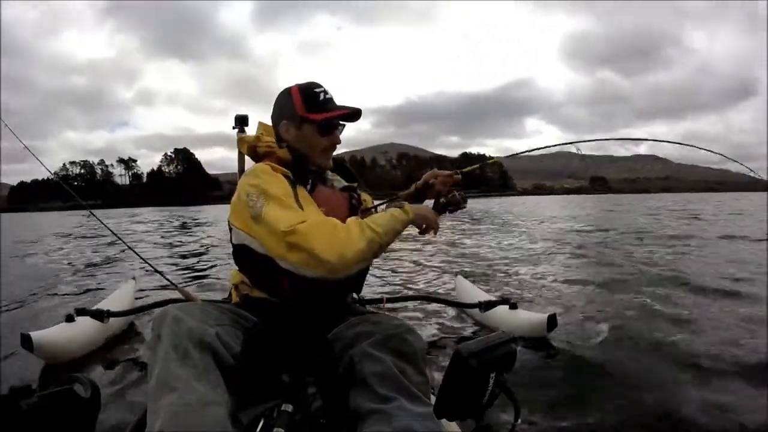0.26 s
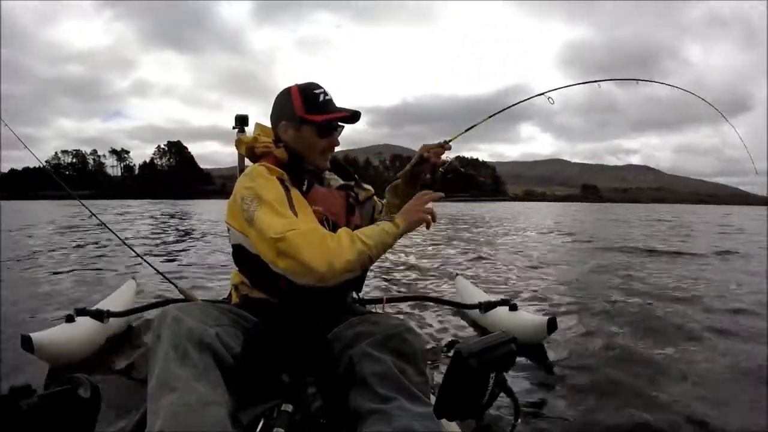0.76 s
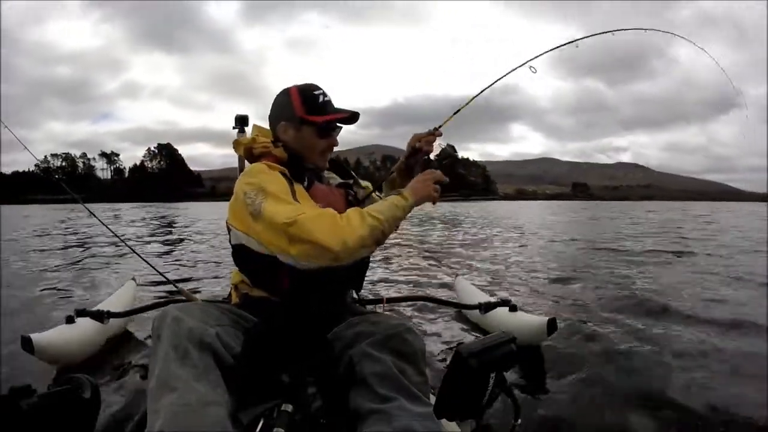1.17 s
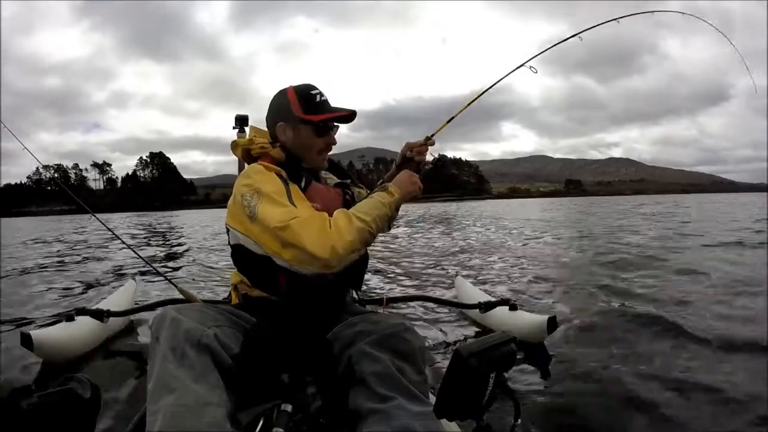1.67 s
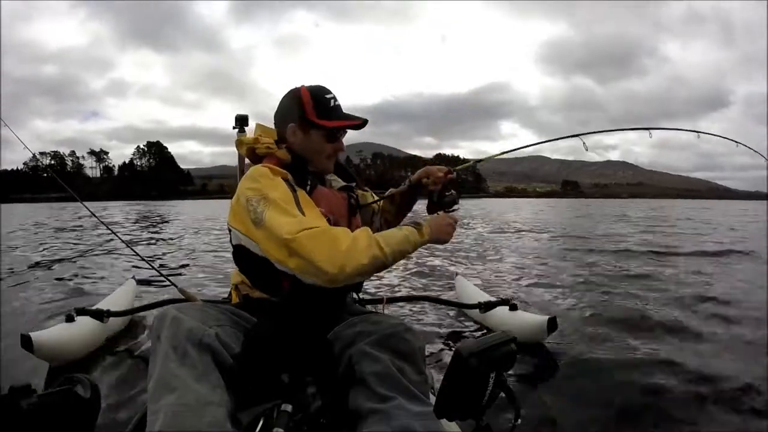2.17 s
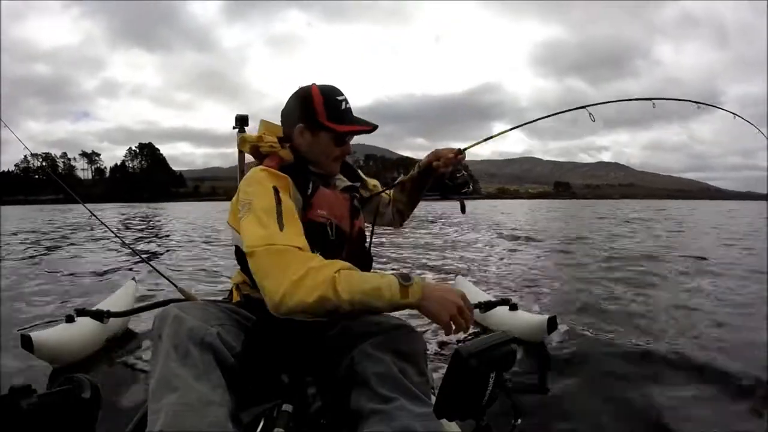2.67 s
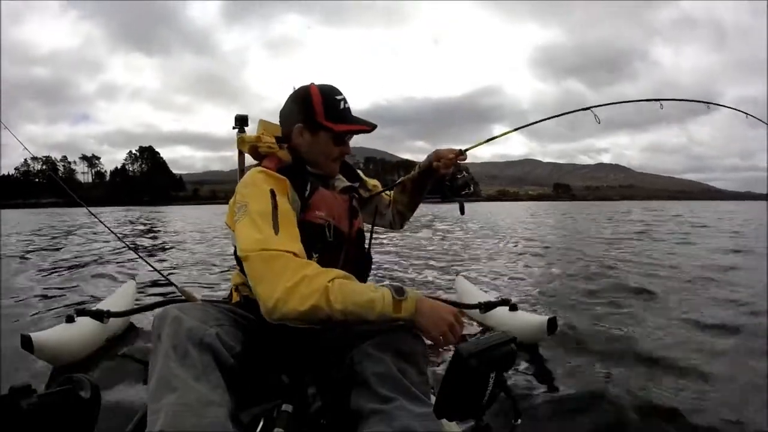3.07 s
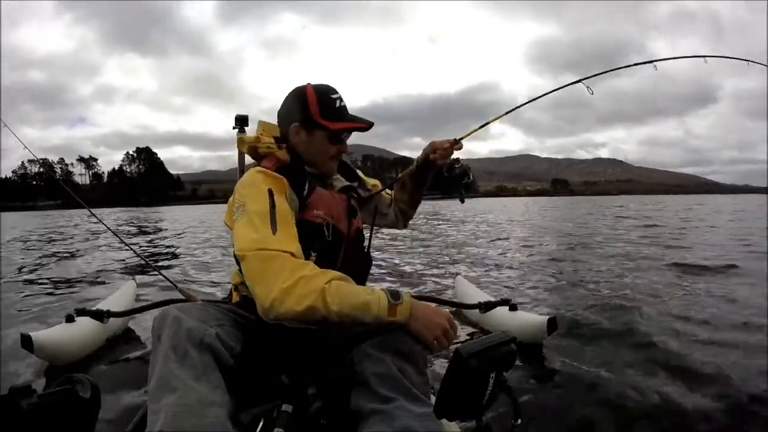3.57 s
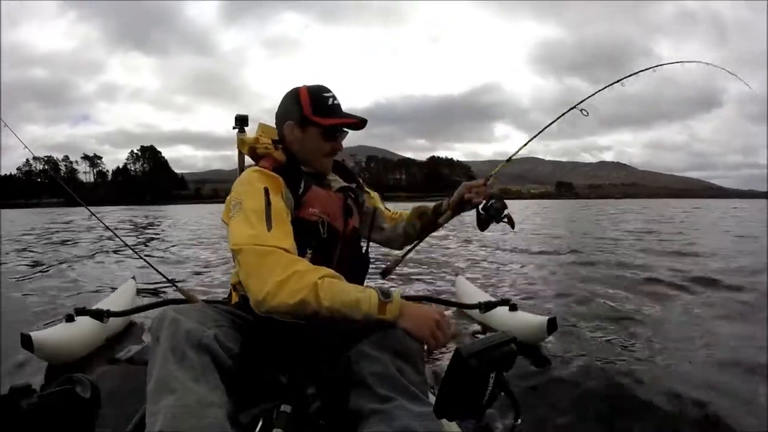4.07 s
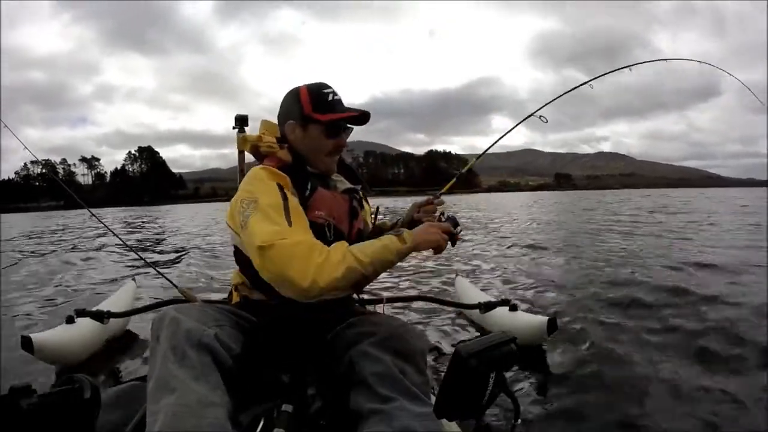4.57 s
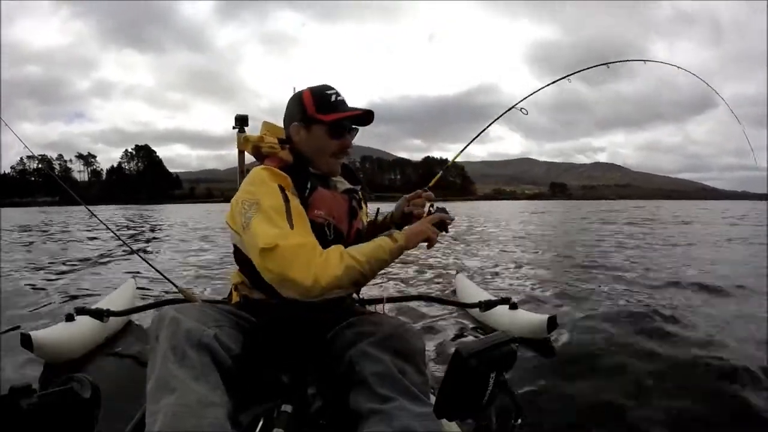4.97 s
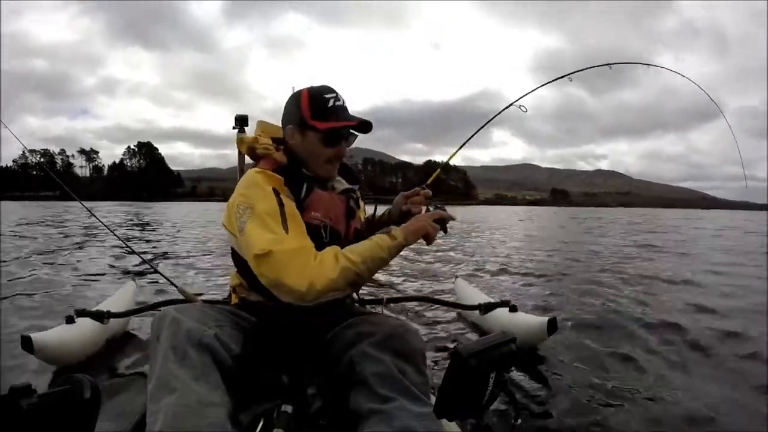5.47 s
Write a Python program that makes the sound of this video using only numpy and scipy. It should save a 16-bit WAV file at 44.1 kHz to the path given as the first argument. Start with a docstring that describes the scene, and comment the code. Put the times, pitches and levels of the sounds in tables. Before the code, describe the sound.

Sharp, hollow knocks of a fishing rod and gear hit a plastic kayak, heard close from a microphone clamped to the boat. A short group comes early, then light reel ticks continue through a quieter stretch, before the loudest knock and a rapid cluster of bumps. Tiny drips come near the end. Lake water hisses softly throughout, with a lumpy rumble of wind and wavelets building late.

```python
"""On a lake, an angler in a plastic kayak plays a fish, heard from a closed housing clamped to the boat.
Impacts of the rod butt and gear excite the modes of the hollow hull. The reel's pawl ticks, friction
drives the reel's resonances and drags a sleeve over the deck, and drops ring as short damped blips.
Behind them lie the hiss of the lake and a lumpy rumble of wind and wavelets that grows towards the end."""
import sys
import numpy as np
from scipy import signal
from scipy.fft import rfft, irfft, next_fast_len
from scipy.io import wavfile
from scipy.ndimage import uniform_filter1d

SR = 44100
rng = np.random.default_rng(int(sys.argv[2]) if len(sys.argv) > 2 else 0)


def unload_wav(signal):
    """Save mono or channel-first audio to the path in sys.argv[1] as 16-bit WAV at rate SR, clipped to [-1, 1]."""
    wavfile.write(
        sys.argv[1],
        SR,
        np.round(np.clip(np.atleast_2d(signal).T, -1, 1) * 32767).astype(np.int16),
    )


N = 252693

# Blows: (time [s], strength [dB], contact time [s], hull boom [dB], deck drumming [dB], rim clack [dB],
# ring length [factor], crack [dB])
KNOCKS = [(0.8407, -18.5, 0.00047, 6, 8.5, 3, 0.92, -28), (.918, -24.5, .0009, 6.5, 7.5, 2, 0.79, -43),
          (0.955, -25, 0.0012, 5, -4, -0.5, 0.83, -34), (1.21, -41.5, 0.0014, 2, -3, -4, 0.72, -34),
          (2.333, -45.5, .00036, 14, -16, 0.5, 0.78, -26), (3.486, -21.5, 0.002, 4, -3.5, -6, 0.88, -42),
          (3.683, -43.5, 0.0014, 17.5, 7.5, -11, 0.56, -28),
          (3.8354, -8.5, 0.0002, -7, 3, -2.5, 0.86, -17.5),
          (4.049, -40, 0.0013, 10.5, -10.5, -1.5, 0.36, -25), (4.227, -32.5, 0.0012, -6, 1.5, -6, 0.33, -5),
          (4.253, -45, .0003, 0, -8, -15, 0.56, -17), (4.315, -36, 0.00046, -2.5, -10, -16, 0.81, -13),
          (4.353, -7.5, 0.0012, -2, -4.5, 6, 0.68, -36), (4.3613, -15, 0.00058, 3, -15, -8, 0.54, -6.5),
          (4.367, -22, 0.0019, 7, 3.5, 9.5, 1, -16.5), (4.3897, -8.5, 0.00055, 3.5, -11, -7, 0.54, -22),
          (4.396, -12.5, 0.00036, -3, 3, 3, 0.43, -9), (4.405, -18.5, 0.001, -17, 4.5, -1.5, 0.98, -30),
          (4.503, -44, 0.0022, -2, -5, -4, 0.98, -28), (5.669, -38.5, 0.0014, 12, -12, -1, .99, -20.5)]
def hull():
    """Superposition: the responses to all blows add."""
    out, noises = np.zeros(N), rng.standard_normal((len(KNOCKS), SR // 2))
    for (start, *blow), noise in zip(KNOCKS, noises):
        add(out, start, knock(noise, *blow))
    return out


# Spectra of a blow's first wave and of its crack: (frequency [Hz], relative density [dB])
THUD = [(100, -26), (300, -2.5), (700, 11), (1100, -7.5), (1700, -8), (2600, -5), (5000, -36)]
CRACK = [(1500, -18), (2500, 8), (3500, 6.5), (4600, -4), (6000, -3.5), (9000, -19.5), (13000, -59),
         (16000, -45)]
def knock(noise, db, contact_s, boom_db, deck_db, rim_db, length, crack_db):
    """Impact excitation: a long contact low-passes the blow; the hand-held rod damps the ringing."""
    t, f = np.arange(len(noise)) / SR, np.fft.rfftfreq(len(noise), 1 / SR)
    thud = burst(np.roll(noise, len(t) // 2), THUD, t60=0.029, rise=0.00086)
    response = 0.45 * hull_modes(t, length) + gain_of(-9) * shell(noise, t, f, length)
    response += gain_of(-5) * thud
    force = 1 / (1 + 1j * f * contact_s) ** 2
    boom = 1 + (gain_of(boom_db) - 1) / (1 + 1j * f / 130) ** 2  # bass shelf
    colour = boom * resonance(f, 245, 1.45, deck_db) * resonance(f, 834, 3.2, rim_db)
    body = irfft(rfft(response) * force * colour, len(t))
    momentum = 1 + contact_s / 0.001  # a longer push hands over more
    crack = burst(noise[::-1], CRACK, t60=0.029 * length ** 1.9)
    return gain_of(db) * (body * momentum + gain_of(crack_db) * crack)


# Hull modes: (frequency [Hz], relative level [dB], T60 before damping by the rod [s])
HULL_MODES = [(56.3, -30, 0.13), (85.5, -17.5, 0.38), (111.9, -19, 0.43), (173, -8, 0.15),
              (267.8, -2.5, 0.1), (355.3, -12.5, 0.1), (468, -19, 0.068), (571, -4.5, 0.066),
              (656, -9.5, 0.094), (743, -15.5, 0.068), (856, -11.5, 0.095), (999, -4.5, 0.063),
              (1097, -6, 0.048), (1262, -18, 0.062), (1475, -10, 0.051), (1990, -30, 0.042),
              (1956, -8.5, 0.036), (2164, -5, 0.039), (2750, -18, 0.013), (2990, -20.5, 0.048),
              (3490, -10, 0.027), (4240, -28, 0.038), (5050, -26, 0.04)]
def hull_modes(t, length):
    """Dispersion: bending waves run faster at high frequency, so the low modes start later."""
    hz, db, t60 = np.transpose(HULL_MODES)[:, :, None]
    polarity = (-1) ** np.arange(len(hz))[:, None]
    damping = length ** np.clip(np.log2(hz / 90), 0, 1)  # the lowest modes move the whole boat, ring on
    since_arrival = np.maximum(t - 0.0007 * np.sqrt(500 / hz), 0)
    return (polarity * gain_of(db) * ring(hz, t60 * damping, since_arrival, rise=0.6 / hz)).sum(0)


# Ringing between the modes: (frequency [Hz], relative density [dB])
SHELL = [(29, -40), (50, -16), (278, 4.5), (486, -2.5), (991, -1.5), (1200, -7.5), (1980, -14.5),
         (5000, -52.5), (6500, -66), (11000, -120)]
# Its decay: (frequency [Hz], T60 before damping by the rod [s])
SHELL_T60 = [(60, 0.81), (210, 0.18), (560, 0.16), (1470, 0.065), (4000, 0.042), (12000, 0.026)]
def shell(noise, t, f, length):
    """Modal overlap: crowded modes merge into noise, each band swelling and decaying at its own rate."""
    hz = np.geomspace(60, 5000, num=14)[:, None]
    filter_bank = np.maximum(1 - abs(np.log((f + 1) / hz)) / np.log(hz[1] / hz[0]), 0)
    bands = irfft(rfft(coloured(noise, SHELL)) * filter_bank, len(t))
    swell = 1 - np.exp(-t * hz / 2)
    decay = gain_of(-60 * t / (length * at_frequency(SHELL_T60, hz)))
    return (bands * swell * decay).sum(0)


# Pawl strikes: (time [s], lower mode level [dB], upper mode level [dB])
TICKS = [(0.0144, -45.5, -79), (0.0638, -61, -60), (0.1141, -49, -63), (0.1815, -54, -80),
         (0.2209, -51, -70), (0.2503, -51, -62), (0.2835, -41.5, -68), (0.391, -55, -79),
         (0.5117, -45, -81), (0.8305, -44, -74), (1.0276, -49, -79), (1.4696, -54, -64), (1.6257, -53, -81),
         (2.0178, -49, -81), (2.1271, -52, -81), (2.3151, -59, -61), (2.4374, -47, -57), (2.551, -61, -61),
         (2.8439, -54, -59), (2.9317, -56, -63), (3.0614, -61, -59), (3.3777, -62, -56), (4.0033, -59, -84),
         (4.9167, -58, -80), (5.4251, -54, -78), (5.5563, -52, -80)]
# Pawl modes: (frequency [Hz], T60 [s])
PAWL_MODES = [(4950, 0.012), (12200, 0.02)]
# Dry edge of a tick or drop: (frequency [Hz], relative density [dB])
CLICK = [(1000, -29), (2500, -1), (5000, 3), (9000, -8), (13000, -19), (16000, -15)]
def reel_ticks():
    """Free vibration: each strike of the pawl clicks and rings in two short modes."""
    out, t = np.zeros(N), np.arange(2000) / SR
    for (start, *levels_db), noise in zip(TICKS, rng.standard_normal((len(TICKS), len(t)))):
        for db, (hz, t60) in zip(levels_db, PAWL_MODES):
            add(out, start, gain_of(db) * ring(hz, t60, t, rise=0.0013))
        add(out, start, gain_of(-56) * burst(noise, CLICK, t60=0.016))
    return out


# Spool strokes: (time [s], duration [s], level [dB])
CHAFES = [(1.853, 0.19, -61), (2.117, .03, -65)]
# Reel modes: (frequency [Hz], half width [Hz], relative level [dB])
REEL_MODES = [(550, 120, 5.5), (2200, 230, 1), (3140, 120, -7.5), (5000, 100, -7), (5480, 70, -5),
              (6000, 110, -5), (6330, 87, -17), (6870, 100, -14)]
def reel_chafe():
    """Frictional excitation: the chafing spool catches and releases each metal mode on its own."""
    out, size = np.zeros(N), next_fast_len(N, real=True)
    f, pressure = np.fft.rfftfreq(size, 1 / SR), strokes(CHAFES)
    start, duration, _ = CHAFES[0]
    dulling_db = -3 - 30 * np.clip(np.arange(N) / SR - start, 0, duration)  # upper modes only
    for hz, width, db in REEL_MODES:
        grip = unit_rms(gain_of(2.1 * wander(N, 900)))
        band = irfft(rfft(rng.standard_normal(size)) / (1 + ((f - hz) / width) ** 2), size)[:N]
        out += unit_rms(band) * grip * gain_of(db + (hz > 4000) * dulling_db) * pressure
    return out


# Sleeve strokes: (time [s], duration [s], level [dB])
RUBS = [(.165, 0.086, -58.5), (4.2, 0.031, -62), (4.25, 0.014, -56.5), (4.83, .21, -64)]
# Cloth friction: (frequency [Hz], relative density [dB])
SLEEVE = [(500, -34), (1400, -23), (2000, 14), (2700, -23), (6000, -12), (10000, -52), (16000, -60)]
def sleeve():
    """Stick-slip friction: cloth drags unevenly over the plastic deck."""
    slips = rng.standard_normal(N) * gain_of(5.4 * wander(N, 200))
    return coloured(slips, SLEEVE) * strokes(RUBS)


# Blips: (time [s], level [dB], frequency [Hz])
DROPS = [(.251, -42.5, 9100), (4.21, -47, 8550), (4.228, -50, 8600), (4.361, -33.5, 9100),
         (4.368, -31, 5450), (4.414, -44, 6540), (4.728, -52, 3560), (4.925, -50, 4300), (5.226, -43, 5300),
         (5.24, -43.5, 2500), (5.243, -38, 4120), (5.243, -44, 6100), (5.28, -50, 2680), (5.31, -51, 4900),
         (5.355, -46, 2800), (5.4, -53, 6050), (5.629, -46, 4340), (5.628, -44.5, 1640)]
def drops():
    """Constant-Q decay: drops, flicks of wet line and tiny gear rattles click and ring for 48 periods."""
    out, t = np.zeros(N), np.arange(3000) / SR
    for (start, db, hz), noise in zip(DROPS, rng.standard_normal((len(DROPS), len(t)))):
        blip = ring(hz, 48 / hz, t, rise=0.0011)
        edge = gain_of(-7) * burst(noise, CLICK, t60=0.0086)
        add(out, start, gain_of(db) * (blip + edge))
    return out


# Spectra of the lake's hiss and of the wavelets: (frequency [Hz], relative density [dB])
LAKE = [(35, -41), (60, -4), (95, 0), (178, -0.5), (355, -5), (526, -0.5), (564, -16), (605, -0.5),
        (855, -12), (1960, -12.5), (2910, -20), (6530, -26.5), (11400, -37), (12500, -38.5), (15000, -43.5)]
LAPPING = [(60, -35), (120, -1.5), (180, -5.5), (260, -6), (400, -37), (800, -62)]
# Wavelet envelope: (time [s], level [dB])
LAPPING_LEVEL = [(0, -61), (1.3, -70), (2.6, -76), (3.7, -62), (4.2, -61.5), (5, -55), (5.73, -58)]
def water():
    """Random excitation: wavelets drum under the floor, beneath the broadband hiss of the lake."""
    hiss = patchy(LAKE, patch_db=0.96, flicker_db=0.96, size=512) * gain_of(-53.5)
    return hiss + patchy(LAPPING, patch_db=0.52, flicker_db=1.5, size=1024) * curve(LAPPING_LEVEL)


# Rumble spectrum: (frequency [Hz], relative density [dB])
RUMBLE = [(8, -33), (25, 6.5), (60, -5), (120, -17.5), (200, -15.5), (320, -34.5), (600, -47), (1000, -87)]
# Envelope of the breeze, and single thumps of wind: (time [s], level [dB])
BREEZE = [(0, -55), (.35, -62), (.55, -58.5), (1.1, -57), (1.55, -55.5), (1.8, -59.5), (2.3, -63),
          (3.3, -63), (3.6, -60), (4.1, -54.5), (4.6, -57), (4.75, -65), (5.0, -54), (5.2, -51), (5.5, -55),
          (5.73, -46.5)]
BUFFETS = [(.77, -58), (1.26, -47.5), (1.37, -62), (3.59, -52), (3.73, -42.5), (5.08, -46), (5.27, -49),
           (5.38, -47), (5.72, -59)]
def rumble():
    """Amplitude modulation: low noise follows the wind and the boat's shudder after each blow."""
    t, buffet_s = np.arange(N) / SR, 0.019
    level = curve(BREEZE) + sum(gain_of(db) * np.exp(-0.5 * ((t - s) / buffet_s) ** 2) for s, db in BUFFETS)
    shudder = gain_of(-27.5) * envelope(t[:SR // 2], t60=0.35, rise=0.033)
    for start, db, _, boom_db, *_ in KNOCKS:
        add(level, start, gain_of(db + boom_db) * shudder)
    return patchy(RUMBLE, patch_db=1.05, flicker_db=1.3, size=2048) * level


def gain_of(db):
    """Decibels to amplitude."""
    return 10 ** (np.asarray(db) / 20)


def unit_rms(x):
    """Normalisation to unit power."""
    return x / np.sqrt(np.mean(x ** 2) + 1e-20)


def at_frequency(table, hz):
    """Interpolation on a log-frequency axis."""
    f, value = np.transpose(table)
    return np.interp(np.log(hz + 1), np.log(f + 1), value)


def curve(table):
    """Amplitude over time, interpolated in decibels."""
    times, db = np.transpose(table)
    return gain_of(np.interp(np.arange(N) / SR, times, db, -200, -200))


def add(mix, start, sound):
    """Superposition of a delayed sound."""
    part = mix[round(start * SR):][:len(sound)]
    part += sound[:len(part)]


def coloured(noise, spectrum):
    """Spectral shaping, at unit power."""
    f = np.fft.rfftfreq(len(noise), 1 / SR)
    return unit_rms(irfft(rfft(noise) * gain_of(at_frequency(spectrum, f)), len(noise)))


def wander(count, span):
    """Slow fluctuation: a moving average of noise."""
    return unit_rms(uniform_filter1d(rng.standard_normal(count), span))


def patchy(spectrum, patch_db, flicker_db, size):
    """Modulated noise: spectral patches drift and all frequencies flicker together."""
    frames, hz = 4 * N // size + 5, np.fft.rfftfreq(size, 1 / SR)
    real, imag, patches = rng.standard_normal((frames, len(hz), 3)).T
    patches = unit_rms(uniform_filter1d(uniform_filter1d(patches, size=10, axis=0), size=8, axis=1))
    db = at_frequency(spectrum, hz)[:, None] + patch_db * patches + flicker_db * wander(frames, 4)
    spectra = (real + 1j * imag) * gain_of(db)
    return unit_rms(signal.istft(spectra, nperseg=size, noverlap=3 * size // 4)[1][:N])


def envelope(t, t60, rise):
    """Exponential decay, 60 dB in t60 seconds, with a soft onset."""
    return gain_of(-60 * t / t60) * (1 - np.exp(-t / rise))


def ring(hz, t60, t, rise):
    """Damped oscillation of one mode."""
    return np.sin(2 * np.pi * hz * t) * envelope(t, t60, rise)


def burst(noise, spectrum, t60, rise=0.00078):
    """Transient of decaying coloured noise."""
    return coloured(noise, spectrum) * envelope(np.arange(len(noise)) / SR, t60, rise)


def strokes(table, attack_s=0.02, sag_db=-3, release_s=0.033):
    """Contact pressure in sliding: quick catch, slow sag, release."""
    pressure = np.zeros(N)
    for start, duration, db in table:
        t = np.arange(N) / SR - start
        gate = np.clip(1 + t / attack_s, 0, 1) * np.clip(1 - (t - duration) / release_s, 0, 1)
        pressure += gain_of(db + sag_db * np.clip(t / duration, 0, 1)) * gate
    return pressure


def resonance(f, hz, q, db):
    """Second-order peak or dip around one frequency."""
    return 1 + (gain_of(db) - 1) / (1 + 1j * q * (f / hz - hz / (f + 1)))


def scene():
    """Superposition of boat, tackle, water and wind in one channel."""
    return (hull() + reel_ticks() + reel_chafe() + sleeve() + drops() + water() + rumble())[None]


# Modes of the air space before the microphone: (frequency [Hz], Q [1], gain [dB])
HOUSING_MODES = [(6600, 18, 2.5), (9500, 7., 1.5)]
def record(dry):
    """Cavity resonance: the housing colours the treble; a low-pass then limits the band."""
    f = np.fft.rfftfreq(N, 1 / SR)
    cavity = np.prod([resonance(f, *mode) for mode in HOUSING_MODES], axis=0)
    lowpass = signal.firwin(511, cutoff=15050, window=("kaiser", 9), fs=SR)
    return signal.oaconvolve(irfft(rfft(dry) * cavity, N), lowpass[None], "same")


dry = scene()
out = record(dry)
unload_wav(out)
```